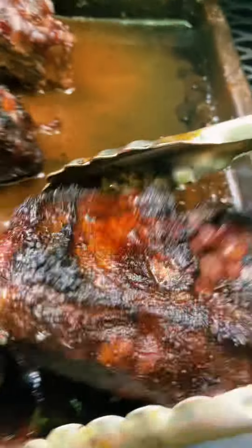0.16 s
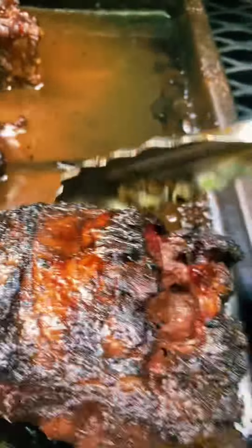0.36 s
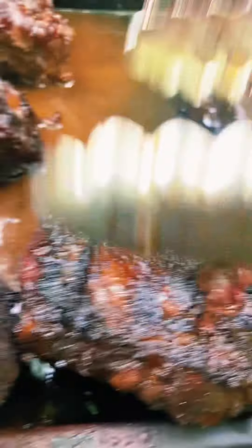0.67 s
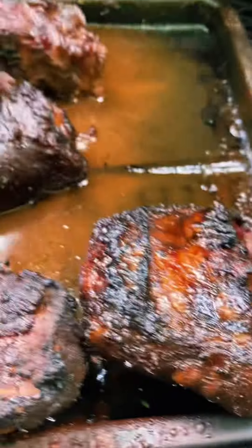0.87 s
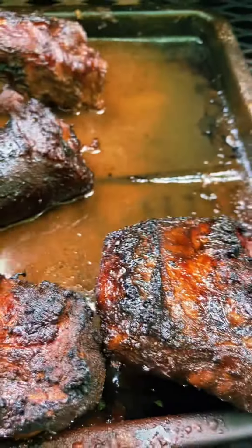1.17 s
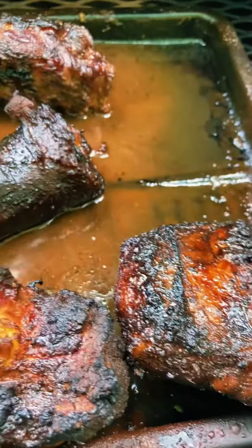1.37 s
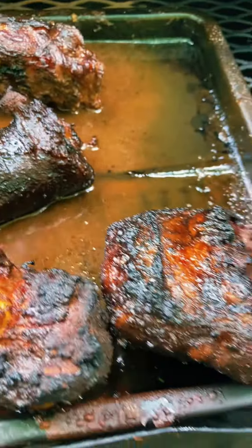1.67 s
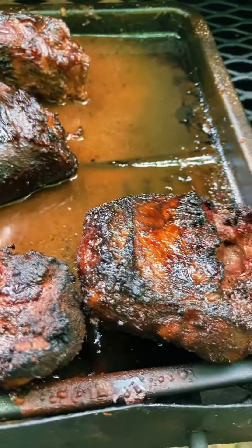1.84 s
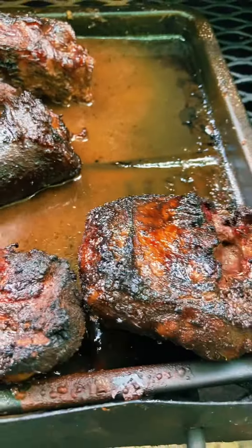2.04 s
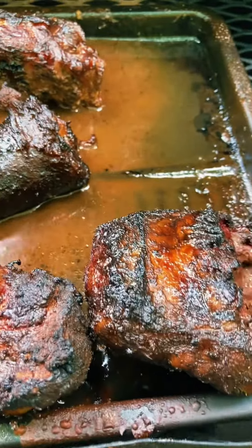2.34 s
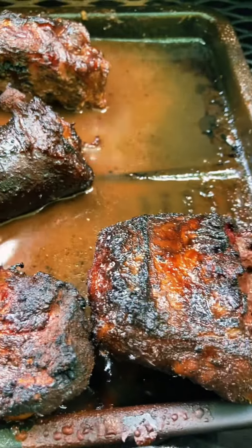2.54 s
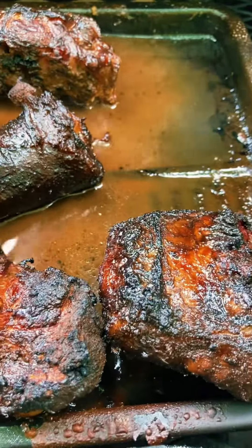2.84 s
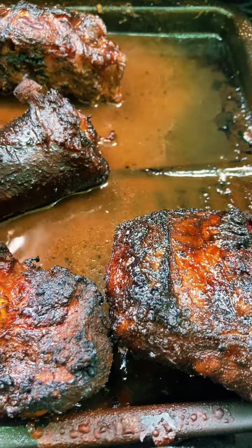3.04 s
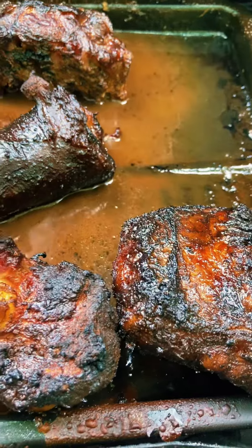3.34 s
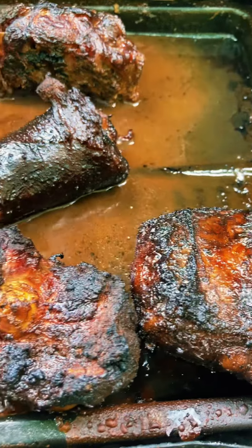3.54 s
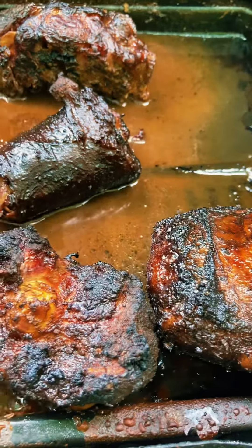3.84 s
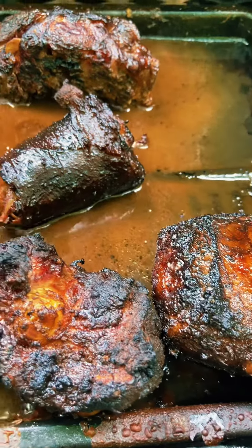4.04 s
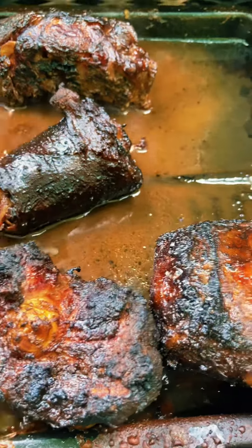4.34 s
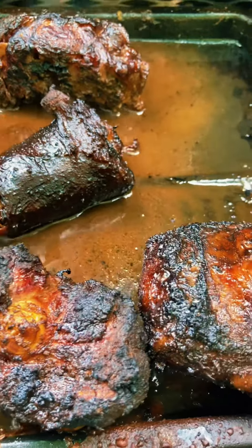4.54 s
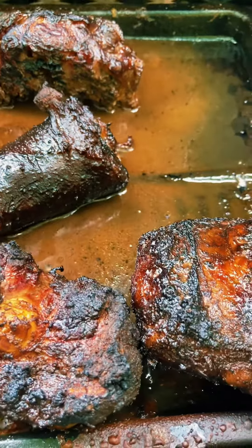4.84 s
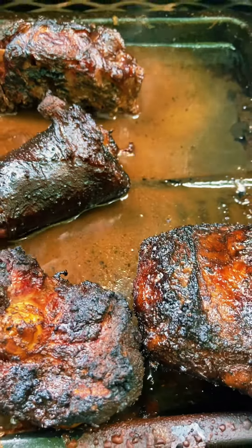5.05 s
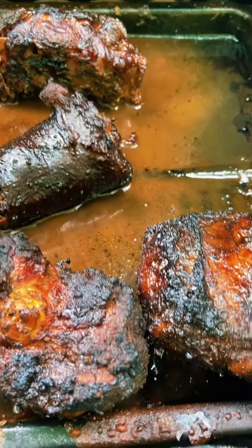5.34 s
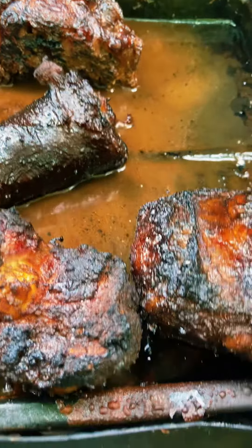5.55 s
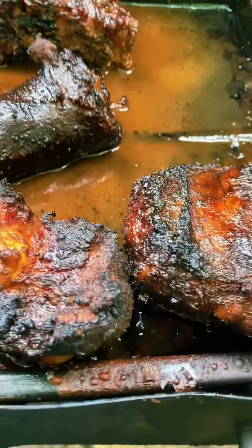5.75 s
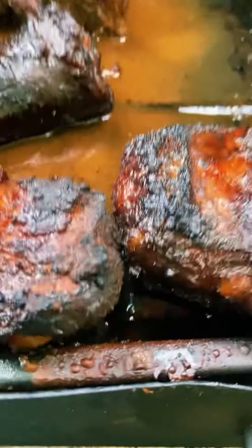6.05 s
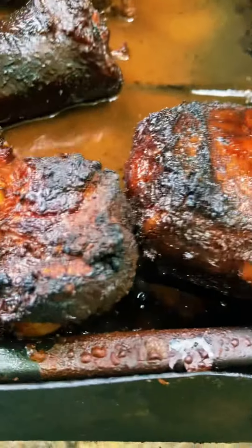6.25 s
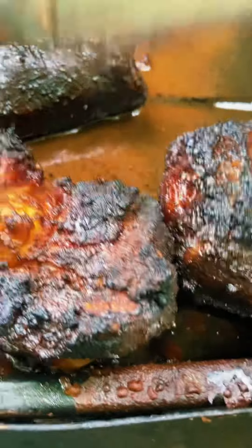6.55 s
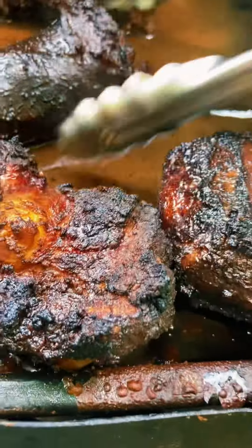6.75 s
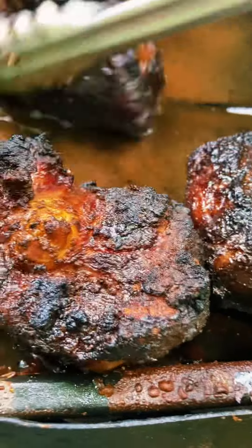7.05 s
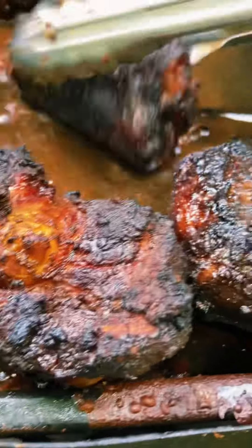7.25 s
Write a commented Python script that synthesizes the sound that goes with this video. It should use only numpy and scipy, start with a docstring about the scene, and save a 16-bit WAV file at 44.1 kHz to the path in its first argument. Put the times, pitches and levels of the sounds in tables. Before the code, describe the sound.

A hand-held stereo microphone sits close to an outdoor smoker. Steel clacks and a dull pan boom open the scene, over a low hum, airy hiss and tiny fat spits. Long uneven bumping, clicking and rubbing of fingers on the casing takes over, strongest early on, with two quick bird chips. Near the end tongs crack sharply on metal, the pan thuds, and meat lifts from juice with a faint fizz.

```python
"""An outdoor smoker, heard close up: metal tongs lift meat in a pan on its wire grate, by a hand-held camera.
Tongs clack as noise bursts over dying sines of steel and shift with rough notes; the pan booms in low modes.
The shifting grip gives knocks and scratches (noise bursts, case modes) and rubs (a shower of slips).
Beneath lie a low hum in rumble and hiss, a faint sizzle and spits of fat (short noise bursts).
A small bird chips twice, each chip a rising whistle with echoes."""
import sys
import numpy as np
from scipy import signal
from scipy.fft import rfft, irfft
from scipy.io import wavfile
from scipy.ndimage import uniform_filter1d

SR = 44100
rng = np.random.default_rng(int(sys.argv[2]) if len(sys.argv) > 2 else 0)


def int16_out(signal):
    """Quantize to a 16-bit WAV file."""
    q = np.round(np.clip(np.atleast_2d(signal).T, -1, 1) * 32767)
    wavfile.write(sys.argv[1], SR, q.astype(np.int16))


N = 326781
TIME = np.arange(N) / SR  # seconds into the scene
AGE = np.arange(SR // 2) / SR  # seconds since a blow

# Steel meets steel, between tongs, pan and grate.
# Each row: start in seconds, level in dB, hardness in dB per octave, t60 in seconds.
CLACKS = [(0.176, -36.5, -1, 0.27), (0.213, -24.5, -8, 0.17), (5.106, -33.5, 1, 0.03),
          (5.181, -36, -4.5, 0.036), (5.22, -33, -0.5, 0.15), (6.232, -18.5, 2, 0.038),
          (6.814, -20, -3.5, 0.11), (6.845, -18, -1, 0.077), (6.86, -31, -5, 0.091),
          (6.8795, -21, -1.5, 0.11), (6.892, -26.5, -7.5, 0.2)]
# Spectrum of a clack before its hardness tilt. Each row: frequency in Hz, relative level in dB.
CLACK_COLOUR = [(250, -1.5), (390, -13), (560, 1.5), (750, -8), (1500, 5), (2200, -2.5), (4000, -2),
                (6000, -4), (9000, -3.5), (12000, -5), (16000, -25)]
# What tongs and grate ring with. Each row: nominal frequency in Hz, relative level in dB, t60 in seconds.
STEEL_MODES = [(500, -26, 0.051), (534, 4, 0.045), (605, -29, 1), (776, -7.5, 0.28), (918, 8, 0.046),
               (1250, 11, 0.048), (1540, 11, 0.1), (1800, 2.5, 0.2), (2045, 5.5, 0.12), (2450, -9, 0.31),
               (3190, 4, 0.051), (3835, -28, 0.18), (4400, -11, 0.25)]
# The tongs' blades graze metal with a thin tink.
# Each row: start in seconds, frequency in Hz, level in dB (of a sine's peak), t60 in seconds.
TINKS = [(.153, 9650, -38, .08), (.196, 10100, -30, .07), (.31, 4210, -49, .15), (.472, 9600, -32, .07),
         (.474, 4240, -48, .22)]
# Tongs shift on the grate with brief rough notes.
# Each row: start in seconds, level in dB, frequency in Hz, t60 in seconds.
TONG_RATTLES = [(1.804, -37, 1150, 0.038), (4.545, -40, 2330, 0.1), (4.571, -40, 1540, .07),
                (4.68, -45, 1550, .13), (4.696, -45.5, 2300, .07), (5.182, -40.5, 2200, 0.043)]
# The laden pan booms as weight lands on it.
# Each row: start in seconds, base frequency in Hz, level in dB ahead of the mode levels, t60 in seconds.
BOOMS = [(0.187, 131.2, -19.5, 0.6), (0.254, 117, -10, 0.15), (5.11, 141.5, -11, 0.21),
         (5.218, 158, -29, 0.48), (6.828, 150, -12, 0.25), (6.884, 154.5, -19.5, 0.42)]
# Modes of the pan's bottom. Each row: multiple of the boom's frequency, level in dB.
PAN_MODES = [(0.802, -16.5), (0.998, -2), (1.168, -4), (1.462, -10.5), (1.85, -17.5)]
# The pan is jolted on the grate and its walls ring. Each row: start in seconds, level in dB.
JOLTS = [(.215, -34), (.221, -28.5), (.283, -39.5), (.309, -41), (6.93, -43)]
# Modes of the walls. Each row: nominal frequency in Hz, relative level in dB, t60 in seconds.
WALL_MODES = [(328, -5.5, 0.25), (498, -1, 0.26), (543, 0.5, 0.11), (597, 0, 0.23), (833, -4.5, 0.16),
              (950, 2.5, 0.14), (1280, -8.5, 0.16)]
# The firmest knocks of the grip on the camera. Each row: start in seconds, body level in dB,
# body frequency in Hz, thump level in dB, click level in dB ahead of the trim in knocks().
KNOCKS = [(1.331, -39, 650, -47, -37.5), (1.411, -27, 457, -33, -32.5), (1.457, -36, 490, -29.5, -52),
          (1.487, -27.5, 457, -29, -33), (1.735, -29.5, 597, -43, -33), (1.742, -29.5, 437, -40, -59),
          (1.787, -35.5, 556, -48, -58), (1.803, -38.5, 730, -37.5, -55), (2.029, -30.5, 610, -30, -49),
          (2.052, -24.5, 507, -35, -31), (2.064, -30, 517, -40, -34), (2.097, -33, 546, -32, -64),
          (2.116, -35, 543, -34.5, -66), (2.462, -19.5, 695, -41.5, -31), (2.551, -13, 416, -22, -30.5),
          (2.568, -16.5, 644, -37, -21.5), (2.625, -21.5, 483, -28, -32.5), (2.671, -26, 480, -34, -62),
          (3.261, -35.5, 607, -43, -56), (3.333, -33.5, 384, -67, -48), (3.377, -24, 686, -50, -37),
          (3.388, -25, 736, -45, -25), (3.415, -31.5, 620, -35.5, -41), (3.469, -33, 710, -50, -46),
          (3.62, -27.5, 670, -45, -42), (3.795, -34, 560, -29.5, -55), (3.824, -27.5, 517, -30.5, -50),
          (4.336, -18.5, 440, -24, -35.5), (4.544, -27.5, 744, -27, -62), (4.569, -30.5, 594, -35, -53),
          (4.776, -30, 480, -38, -62), (4.798, -38.5, 690, -55, -52), (5.107, -36.5, 590, -28.5, -58),
          (5.181, -30.5, 510, -24.5, -49), (5.224, -34, 710, -32.5, -41), (5.433, -28, 766, -34.5, -62),
          (5.655, -24.5, 695, -47, -39), (5.666, -26.5, 746, -38, -40), (5.749, -27, 640, -56, -58),
          (5.777, -22.5, 800, -23, -40), (5.811, -24.5, 616, -24.5, -54), (5.926, -32.5, 730, -35.5, -64),
          (6.001, -35.5, 600, -43, -49)]
# Spectrum of the hollow knock. Each row: multiple of the body frequency, relative level in dB.
KNOCK_COLOUR = [(.2, -17.5), (.35, -19), (.55, -2), (.75, -5), (1, -2.5), (1.5, -4), (2.1, -17.5), (3, -21),
                (5, -57)]
# Spectrum of the case's edge. Each row: frequency in Hz, relative level in dB.
EDGE_COLOUR = [(800, -44), (1500, -17), (1900, -17), (2300, 11.5), (2800, -5), (4500, 3), (6500, -32)]
# The edge sounds with every knock, more when it is firm and high: its level in dB beside a typical knock (dB, Hz).
EDGE_DB, TYPICAL_DB, TYPICAL_HZ = -41, -22, 630
EDGE_DB_PER_DB, EDGE_DB_PER_OCTAVE = 1.36, 21
# Thump modes of the case. Each row: nominal frequency in Hz, relative level in dB, t60 in seconds.
CASE_MODES = [(67, 2.5, 0.12), (81, -1.5, 0.7), (114.04, 3, 0.46), (148.8, 2, 0.51), (194, -1, 0.19),
              (242.2, 2.5, 0.35), (299.8, 5, 0.19)]
# A fingertip or nail skips over the case with a dry scratch.
# Each row: start in seconds, level in dB, brightness in dB per octave.
SCRATCHES = [(1.333, -46, -10), (1.488, -46, -8), (1.804, -35, -5), (1.95, -32.5, -10), (2.464, -23, -5.5),
             (2.624, -22, -11), (3.262, -37.5, -3.5), (3.3, -41, 1), (3.414, -37, 0), (3.47, -38.5, -2),
             (3.564, -30, 0), (3.62, -40, 3.5), (3.705, -35.5, 3.5), (3.753, -33, -5), (3.789, -38, -2),
             (4.336, -33, -5), (4.604, -42, -1), (4.623, -38.5, -9), (4.68, -45, -3.5), (4.695, -41, -4),
             (4.753, -36.5, -3.5), (5.141, -39, -8)]
# Spectrum of a scratch before its tilt. Each row: frequency in Hz, relative level in dB.
SCRATCH_COLOUR = [(250, -4), (600, 0), (1100, 5.5), (1800, -2.5), (2500, -5.5), (3500, -6.5), (4500, 0),
                  (6000, -11), (9000, -9.5), (16000, -31)]
# Strokes of skin over the camera, sticky or smooth. Each row: start in seconds, length in seconds,
# level in dB ahead of the trim in rub(), its catches in dB over that level.
STROKES = [(1.346, 0.17, -39.5, 2), (1.757, .15, -48.5, 10.5), (2.001, .14, -40, -3.5), (2.36, .04, -42, 9),
           (2.542, .13, -36.5, -13), (2.947, .1, -47.5, 5), (3.207, .25, -49, -0.5),
           (3.546, .04, -35.5, -3), (3.624, 0.256, -34.5, -13), (3.891, .2, -38, -16),
           (4.079, .07, -33, -22), (4.245, .055, -35.5, -17), (4.332, .04, -35, -6), (4.554, 0.13, -40, 0),
           (4.683, .12, -45.5, -7), (5.12, .13, -39, 1), (5.397, 0.11, -39, 2), (5.777, .1, -39, -17)]
# The hand also rests on the case and creeps. Each row: start in seconds, end in seconds.
RESTS = [(2.14, 4.75), (5.26, 5.4)]
REST_DB = -49.5  # ahead of the trim in rub()
PRESS_DB_PER_S, RELEASE_DB_PER_S = 644, 330  # how fast a stroke builds and lets go
# Spectrum of rubbing skin. Each row: frequency in Hz, relative level in dB.
RUB_COLOUR = [(45, -26), (80, -11), (130, 8.5), (200, -3.5), (300, 7.5), (430, -2.5), (560, 2), (800, -7),
              (1200, -1.5), (1700, -16.5), (2500, -16.5), (4200, -20), (9000, -22.5), (16000, -33)]
# The hollow between hand and case sings as the grip slides. Each row: time in seconds, frequency in Hz.
HOLLOW = [(1.3, 630), (2.7, 640), (3.55, 740), (3.72, 890), (3.84, 500), (3.92, 420), (4.12, 564),
          (4.3, 600), (5.9, 826)]
# Wet meat peels out of the juice with a fizz. Each row: time in seconds, level in dB.
FIZZ = [(6.9, -45.5), (7.08, -46.5), (7.12, -38), (7.2, -42.5), (7.41, -44)]
# Spectrum of the fizz. Each row: frequency in Hz, relative level in dB.
FIZZ_COLOUR = [(200, 10.5), (700, -3.5), (1200, 2.5), (1800, 4), (3000, -4.5), (6000, -1.5), (9000, 1.5),
               (11000, 3), (16000, -1.5)]
# The sharpest snaps, as of fat spitting. Each row: start in seconds, level in dB.
SPITS = [(0.564, -42), (0.781, -44.5), (1.11, -44.5), (1.266, -41), (1.85, -44), (4.855, -42), (2.91, -21),
         (3.299, -47.5), (3.5668, -36), (3.895, -37.5), (4.794, -34.5), (5.153, -38), (5.5974, -39.5),
         (6.435, -42.5), (6.985, -41.5)]
# Spectrum of grip clicks, spits and sizzle. Each row: frequency in Hz, relative level in dB.
CLICK_COLOUR = [(600, -11), (1500, 0.5), (3000, -6), (6000, 0), (9000, 2), (12000, 4), (16000, -19)]
# A bird's rising chip.
# Each row: start in seconds, peak level in dB, start frequency in Hz, top frequency in Hz, length in seconds.
CHIPS = [(0.958, -23.5, 5850, 8490, .019), (2.916, -26, 6270, 8410, 0.019)]
# Spectrum of smoker rumble and open-air hiss. Each row: frequency in Hz, relative level in dB per Hz.
AIR_COLOUR = [(25, -25), (50, 7), (80, -3.5), (120, 5.5), (160, 0.5), (200, -14.5), (260, -13.5),
              (400, -18.5), (700, -23), (1900, -22.5), (4500, -28), (9000, -23), (15000, -25.5)]
# The smoker's hum. Each row: mean frequency in Hz, level in dB ahead of the throb.
HUM = [(117, -49.5), (162, -63)]
# Phase between the two microphone ports. Each row: frequency in Hz, lead of the left in radians.
PORT_PHASE = [(200, 0), (550, -1.25), (1300, -1.9), (2000, -5), (4000, -4.7), (5200, -3.2), (5900, -3.05),
              (7800, -.1), (9300, 0), (11200, 3.1), (12400, 3.2), (14200, 6.25)]
# How alike the ports sound. Each row: frequency in Hz, likeness from 0 to 1.
PORT_LIKENESS = [(50, 0.88), (130, 0.97), (350, 0.93), (800, 1), (1600, 0.19), (3200, 0.047), (5500, 0.98),
                 (9000, 0.97), (16000, 1)]
# Balance of the ports. Each row: frequency in Hz, left minus right in dB.
PORT_BALANCE = [(60, 4), (200, 2.5), (360, 6), (600, 1), (1200, -0.5), (2300, -2), (4500, 0), (8000, -0.5)]
CUTOFF_HZ = 16200


def tongs(ring_db=-9, echo_db=-21):
    """Each clack is a hard crack, a noisy clatter and a short ring of steel; grazing blades add thin tinks."""
    out = np.zeros((2, N))
    for s, db, hardness, t60 in CLACKS:
        sheet = colour(noise(len(AGE)), CLACK_COLOUR, tilt_db=hardness)
        sheet = uneven(sheet, depth_db=3.5, width_hz=120)
        low = lowpass(sheet, hz=2980)
        # the treble speaks a touch sooner
        clatter = low * decay(t60, .0004) + (sheet - low) * decay(t60, .0003)
        crack = 2.2 * sheet * decay(.004, .00005)
        clack = unit(clatter + crack, size=530)
        steel = unit(ring(STEEL_MODES, 0.0014, 0.0013), size=530)
        steel = steel * t60 / 0.12  # a damped blow leaves little ring
        add(out, s, from_db(db) * (clack + from_db(ring_db) * steel))
    for s, hz, db, t60 in TINKS:
        graze = unit(resonate(noise(len(AGE)), hz + 0 * AGE, width_hz=hz / 70))  # a rough, fuzzy tone
        add(out, s, from_db(db) * decay(t60, 0.00084) * graze / np.sqrt(2))
    echoes = outdoors(lowpass(out, hz=5000), 0.08, 0.0033)
    return out + from_db(echo_db) * echoes


def tong_rattles(width_hz=350, rise_s=0.00065):
    """Tongs shift on the grate: noise through a doubled resonance gives a brief rough note."""
    out = np.zeros((2, N))
    for s, db, hz, t60 in TONG_RATTLES:
        pitch = np.full(len(AGE), hz)
        note = resonate(resonate(noise(len(AGE)), pitch, width_hz), pitch, width_hz)
        add(out, s, from_db(db) * unit(note * decay(t60, rise_s), size=530))
    return out


def pan(rise_s=0.0056):
    """The pan's bottom flexes in a few low modes, damped by meat and juice."""
    out = np.zeros((2, N))
    for s, hz, db, t60 in BOOMS:
        flex = 0
        for multiple, mode_db in PAN_MODES:
            flex = flex + from_db(mode_db) * np.sin(2 * np.pi * multiple * hz * AGE)
        add(out[:1], s, from_db(db) * decay(t60, rise_s) * flex)
    return out


def walls(rise_s=0.00062, chatter_db=3.0):
    """The pan's thin walls ring above its bottom, roughly, as it chatters on the wires."""
    out = np.zeros((2, N))
    for s, db in JOLTS:
        chatter = from_db(chatter_db * drift(283)[:len(AGE)])
        add(out, s, from_db(db) * unit(ring(WALL_MODES, 0.0029, rise_s) * chatter, size=1320))
    return out


def knocks(click_trim_db=-1, tail_db=-16, swell_db=-18):
    """A slip of the grip: a click, a hollow knock and a low thump through the case."""
    out = np.zeros((2, N))
    for s, db, hz, thump_db, click_db in KNOCKS + small_knocks():
        firmness = EDGE_DB_PER_DB * (db - TYPICAL_DB)
        height = EDGE_DB_PER_OCTAVE * np.log2(hz / TYPICAL_HZ)
        hollow = slip(db, KNOCK_COLOUR, 0.065, 0.0004, base_hz=hz, width_hz=99.7)
        tail = slip(db + tail_db, KNOCK_COLOUR, 0.23, 0.0043, base_hz=hz, width_hz=44)
        rim = slip(EDGE_DB + firmness + height, EDGE_COLOUR, 0.084, 0.00022, grit_db=3.5)
        tick = slip(click_db + click_trim_db, CLICK_COLOUR, 0.048, 0.000087, tilt_db=-1.4, grit_db=8.5)
        # a faint reversed copy swells up ahead of each knock
        swell = ((hollow + rim + tick) * decay(.09, .0001))[:, ::-1]
        add(out, s - len(AGE) / SR, from_db(swell_db) * swell)
        add(out, s, hollow + tail + rim + tick)
        add(out, s, from_db(thump_db) * unit(ring(CASE_MODES, 0.0695, 0.0015), size=1320))
    return out


def small_knocks(count=30, thump_db=-2, click_db=-9, spread_db=4.5, hz=600, spread_octaves=0.63):
    """The fingers catch at random along the strokes, as hard as they press: rows like those of KNOCKS."""
    start, length, level, catch = np.transpose(STROKES)
    rubbed = np.cumsum(length)  # seconds of rubbing by the end of each stroke
    along = (np.arange(count) + rng.random(count)) / count * rubbed[-1]
    k = np.searchsorted(rubbed, along)  # the stroke each catch falls in
    force, pitch, thump, click = np.clip(rng.standard_normal((count, 4)), -2, 2).T
    when = start[k] + length[k] - (rubbed[k] - along)
    db = level[k] + catch[k] + spread_db * force
    body_hz = hz * 2 ** (spread_octaves * pitch)
    return list(zip(when, db, body_hz, db + thump_db + spread_db * thump, db + click_db + spread_db * click))


def scratches(t60=0.069, rise_s=0.00017, grit_db=-3.0):
    """Short gritty bursts of friction, too light to thump the case."""
    out = np.zeros((2, N))
    for s, db, brightness in SCRATCHES:
        scratch = slip(db, SCRATCH_COLOUR, t60, rise_s, tilt_db=brightness, width_hz=220, grit_db=grit_db)
        add(out, s, scratch)
    return out


def rub(grip_db, level_db=1.5, slips_per_s=1500, spread_db=2.5, smooth=0.45, judder_db=2.0, sing=1.97, shift_db=4.0):
    """Skin sticks and slips: a shower of tiny uneven pushes into a case whose resonances shift under the fingers."""
    sizes = from_db(spread_db * np.minimum(rng.exponential(1, N), 3))
    slips = (rng.random(N) < slips_per_s / SR) * sizes
    drive = unit(slips * rng.choice([-1, 1], (2, N))) + smooth * noise(N)
    hollow_hz = np.interp(TIME, *np.transpose(HOLLOW))
    drive = drive + sing * resonate(drive, hollow_hz, width_hz=89)
    z = signal.stft(colour(drive, RUB_COLOUR), nperseg=1024, noverlap=768)[2]
    # random patches over frequency and time lift and sink the resonances
    patches = uniform_filter1d(rng.standard_normal(z.shape[1:]), size=3, axis=0)
    patches = unit(uniform_filter1d(patches, size=14, axis=1))
    z = z * from_db(shift_db * np.clip(patches, -2, 2))
    scrape = signal.istft(z, nperseg=1024, noverlap=768)[1][:, :N]
    # the colour shifts, the power follows the pressure
    scrape = scrape / np.sqrt(uniform_filter1d(scrape ** 2, size=1800, axis=1) + 1e-12)
    return scrape * from_db(grip_db + level_db + judder_db * drift(55))


def pressure():
    """Level of the rubbing in dB: every stroke builds, holds and lets go."""
    holds = [(s, s + length, db) for s, length, db, _ in STROKES]
    holds += [(start, end, REST_DB) for start, end in RESTS]
    out = np.full(N, -100.)
    for start, end, db in holds:
        slope = np.minimum(PRESS_DB_PER_S * (TIME - start), RELEASE_DB_PER_S * (end - TIME))
        out = np.maximum(out, db + np.minimum(0, slope))
    return out


def sizzle(level_db=-59, bursts_per_s=130, spread_db=4.5, fizz_per_s=3500):
    """Tiny bubbles burst on the hot meat, and thickly where a piece is lifted from the juice."""
    size = from_db(spread_db * np.minimum(rng.exponential(1, N), 4)) * noise(N)
    bursts = size * (rng.random(N) < bursts_per_s / SR)
    fizz = size * (rng.random(N) < fizz_per_s / SR) + .5 * noise(N)
    sparse = unit(colour(bursts, CLICK_COLOUR))
    dense = unit(colour(fizz, FIZZ_COLOUR))
    fizz_db = np.interp(TIME, *np.transpose(FIZZ), left=-100)
    return from_db(level_db) * sparse + from_db(fizz_db) * dense


def spits(tail=0.25, tail_t60=0.048, count=5, faint_db=-49, spread_db=4):
    """Single dry snaps of noise with a fainter, slower-fading tail; faint ones fall at random."""
    out = np.zeros((2, N))
    envelope = decay(.005, .0001) + tail * decay(tail_t60, 0.0022)
    faint = [(when * N / SR, faint_db + spread_db * size) for when, size in rng.random((count, 2))]
    for s, db in SPITS + faint:
        snap = colour(noise(len(AGE)), CLICK_COLOUR, tilt_db=-1.0) * envelope
        add(out, s, from_db(db) * unit(snap, size=530))
    return out


def bird(echo_db=-3, echo_t60=0.22):
    """A whistle sweeps up in a blink, and the yard scatters it."""
    out = np.zeros((2, N))
    for s, db, start_hz, top_hz, length in CHIPS:
        u = np.arange(0, 1, 1 / (length * SR))  # progress through the chip
        hz = top_hz - (top_hz - start_hz) * (1 - u) ** 2
        whistle = np.sin(2 * np.pi * np.cumsum(hz) / SR)
        add(out[:1], s, from_db(db) * np.sin(np.pi * u) * whistle)
    return out + from_db(echo_db) * outdoors(out[[0, 0]], echo_t60, 0.0024)


def smoker(air_db=-42.0, waver=0.02483, throb=0.68, flutter_db=-1.5, swell_db=1.77, surge_db=1.24):
    """A wavering low hum of sines in an uneven rumble, under a gently swelling hiss."""
    air = unit(colour(noise(N), AIR_COLOUR)) * from_db(swell_db * drift(2.71))
    low = lowpass(air, hz=250)
    flutter = low * (from_db(flutter_db * drift(3.8)) - 1)
    edges = [lowpass(air, hz=edge) for edge in (800, 2000, 5000)]
    surges = 0
    for lower, upper in zip(edges, edges[1:]):  # two bands of the hiss swell by themselves
        surges = surges + (upper - lower) * (from_db(surge_db * drift(18)) - 1)
    out = from_db(air_db) * (air + surges + flutter)
    for hz, db in HUM:
        turns = np.cumsum(hz * (1 + waver * drift(14))) / SR
        out[0] += from_db(db) * np.sqrt(2) * (1 + throb * drift(9.4)) * np.sin(2 * np.pi * turns)
    return out


def slip(db, points, t60, rise_s, base_hz=1, tilt_db=0, width_hz=250, grit_db=0):
    """One burst of friction, dying away; grit breaks it into tiny catches."""
    burst = colour(noise(len(AGE)), points, base_hz, tilt_db)
    burst = uneven(burst, depth_db=4.0, width_hz=width_hz)
    grit = np.clip(rng.standard_normal(500), -2, 2)
    catches = from_db(grit_db * np.interp(AGE * 900, np.arange(500), grit))  # 900 points a second
    return from_db(db) * unit(burst * catches * decay(t60, rise_s), size=530)


def ring(modes, detune, rise_s):
    """Dying sines; every blow shares its force among them differently."""
    out = 0
    for hz, db, t60 in modes:
        turns = hz * (1 + detune * rng.standard_normal()) * AGE + rng.random((2, 1))
        gain = from_db(db + 2 * rng.standard_normal())
        out = out + gain * decay(t60, rise_s) * np.sin(2 * np.pi * turns)
    return out


def decay(t60, rise_s):
    """Envelope of a blow: a quick rise, then a fall of 60 dB per t60."""
    return from_db(-60 * AGE / max(t60, 1e-3)) * (1 - np.exp(-AGE / rise_s))


def outdoors(x, t60, first_s):
    """Scattered echoes from nearby things, as decaying noise of energy near 1."""
    taps = noise(len(AGE)) * decay(t60, first_s)
    return signal.fftconvolve(x, taps / np.linalg.norm(taps[0]), axes=1)[:, :N]


def uneven(x, depth_db, width_hz):
    """Every point of contact favours some resonances and misses others."""
    hz = np.fft.rfftfreq(x.shape[-1], 1 / SR)
    knots = np.clip(rng.standard_normal(600), -2, 2)
    gain = from_db(depth_db * np.interp(hz / width_hz, np.arange(len(knots)), knots))
    return irfft(rfft(x) * gain, x.shape[-1])


def resonate(x, hz, width_hz):
    """A resonance of gain 1 that follows the curve hz."""
    turn = np.exp(2j * np.pi * np.cumsum(hz) / SR)
    r = np.exp(-np.pi * width_hz / SR)
    # shift the pitch down to zero, smooth there, shift back up
    return 2 * (turn * signal.lfilter([1 - r], [1, -r], x / turn)).real


def colour(x, points, base_hz=1, tilt_db=0):
    """Gives x a spectrum, tilted by some dB per octave above 500 Hz."""
    hz = np.fft.rfftfreq(x.shape[-1], 1 / SR)
    tilt = tilt_db * np.log2(np.maximum(hz, 500) / 500)
    gain = from_db(read(points, hz / base_hz) + tilt)
    return irfft(rfft(x) * gain, x.shape[-1])


def lowpass(x, hz):
    """A gentle low-pass that shifts nothing in time."""
    return signal.sosfiltfilt(signal.butter(2, hz, fs=SR, output="sos"), x)


def noise(size):
    """Two unrelated white noises."""
    return rng.standard_normal((2, size))


def drift(per_s):
    """A random curve of rms 1, with a new point per_s times a second."""
    knots = rng.standard_normal(4000)
    return unit(np.interp(TIME * per_s, np.arange(len(knots)), knots))


def from_db(db):
    """Decibels to gain."""
    return 10 ** (np.asarray(db) / 20)


def unit(x, size=None):
    """Scales to rms 1 over the first size samples."""
    return x / np.sqrt(np.mean(x[..., :size] ** 2) + 1e-20)


def read(points, hz):
    """Reads a table on a log-frequency axis."""
    f, value = np.transpose(points)
    return np.interp(np.log(hz + 1e-6), np.log(f), value)


def add(mix, s, sound):
    """Mixes a sound in at time s."""
    part = mix[:, max(round(s * SR), 0):][:, :sound.shape[-1]]
    part += sound[..., :part.shape[1]]


def scene():
    """Row 0 is the sound that both ports share, row 1 the part in which they differ."""
    cooking = tongs() + tong_rattles() + pan() + walls()
    grip = knocks() + scratches() + rub(pressure())
    background = sizzle() + spits() + bird() + smoker()
    return cooking + grip + background


def record(dry):
    """Two ports that differ in phase and level, then low cut, soft overload and band limit."""
    hz = np.fft.rfftfreq(N + SR, 1 / SR)
    shared, apart = rfft(dry, N + SR)
    like = np.clip(read(PORT_LIKENESS, hz), -1, 1)
    side = from_db(read(PORT_BALANCE, hz))
    left = shared * side
    right = (like * shared + np.sqrt(1 - like ** 2) * apart) * np.exp(-1j * read(PORT_PHASE, hz))
    level = np.sqrt(2 / (1 + side ** 2))  # balance leaves the summed power alone
    ports = irfft(np.array([left, right]) * level, N + SR)[:, :N]
    ports = signal.sosfilt(signal.butter(3, 46, "highpass", fs=SR, output="sos"), ports)
    ports = np.tanh(ports)  # the hardest knocks overload the microphone slightly
    band = signal.firwin(301, CUTOFF_HZ, window=("kaiser", 9), fs=SR)
    return signal.oaconvolve(ports, band[None], "same")


dry = scene()
out = record(dry)
int16_out(out)
```